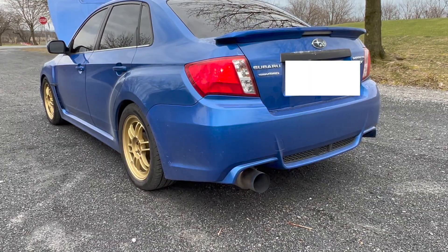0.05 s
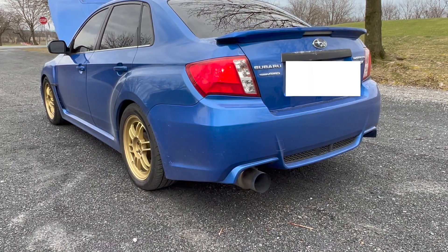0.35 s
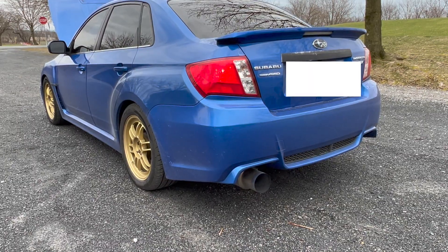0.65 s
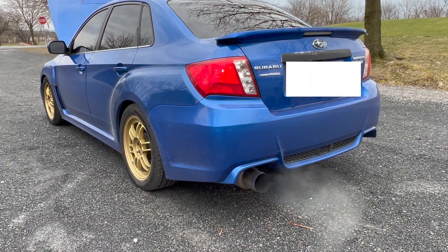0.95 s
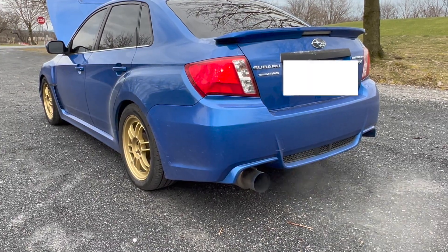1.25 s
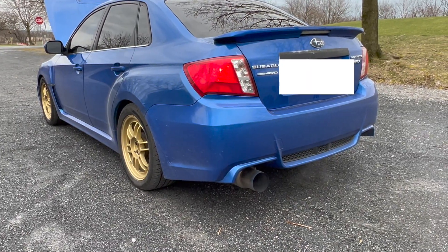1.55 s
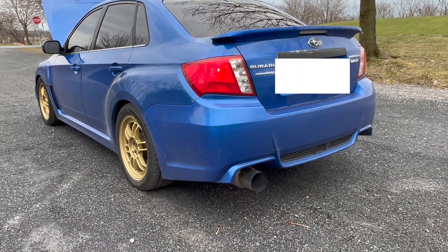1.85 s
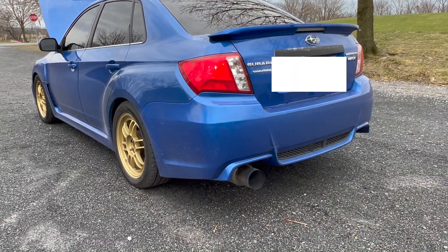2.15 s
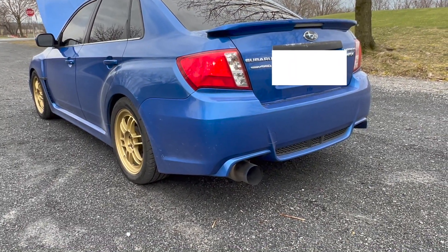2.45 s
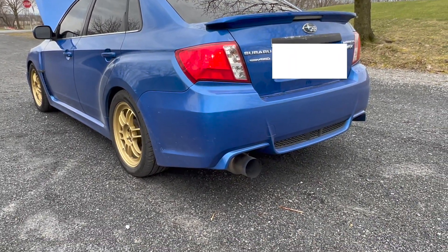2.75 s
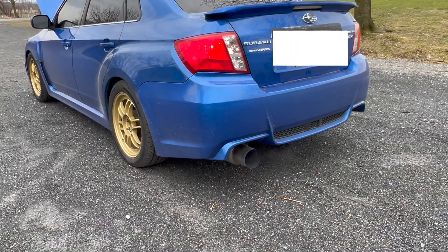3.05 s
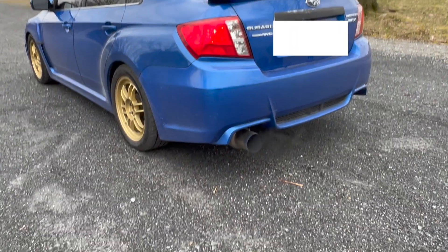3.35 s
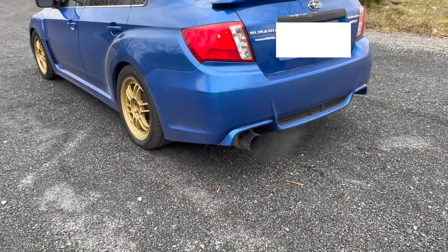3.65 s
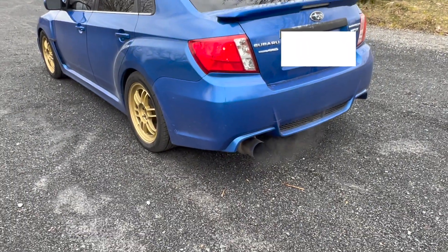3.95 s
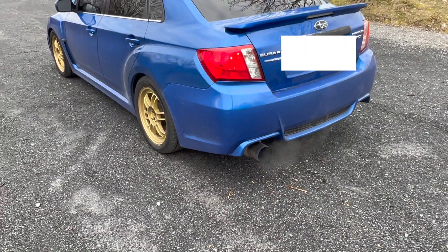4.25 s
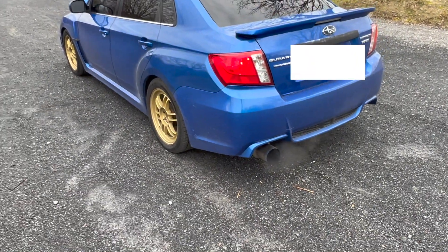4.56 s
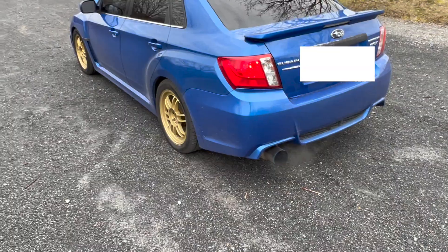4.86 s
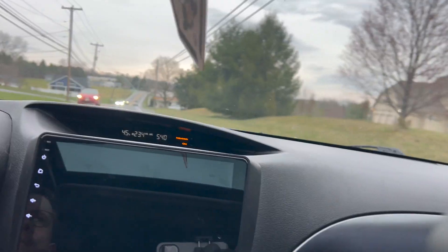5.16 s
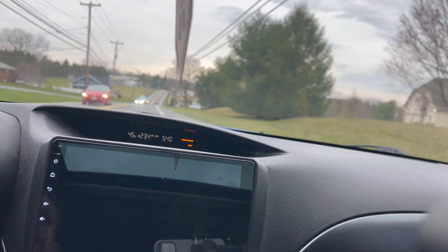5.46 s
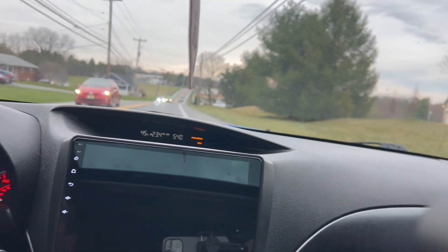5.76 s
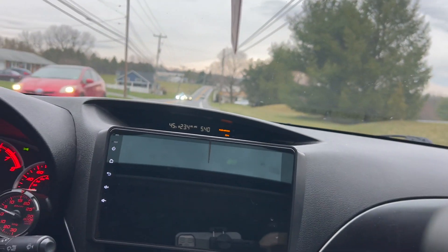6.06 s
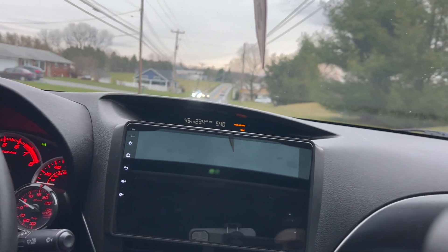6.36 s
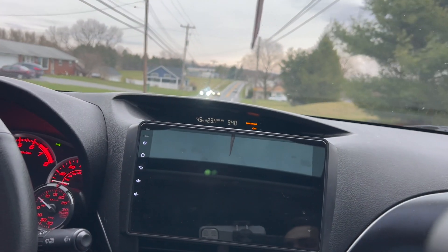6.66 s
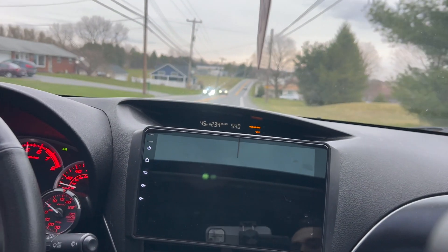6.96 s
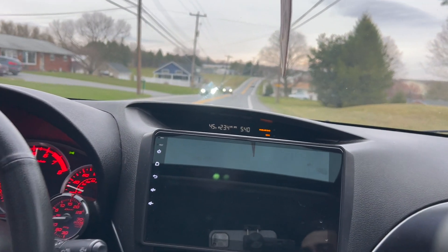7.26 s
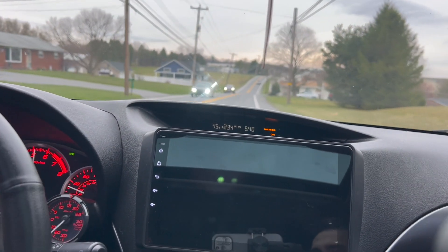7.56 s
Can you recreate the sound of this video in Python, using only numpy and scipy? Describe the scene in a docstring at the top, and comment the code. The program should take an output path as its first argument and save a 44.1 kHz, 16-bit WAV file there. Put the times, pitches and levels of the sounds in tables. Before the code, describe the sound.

Close behind a turbocharged car, the engine is revved once with a deep bark. The exhaust cracks and pops as the revs rise and fall, then settles into a lumpy idle while a faint turbo whistle winds down. The sound cuts to inside the moving car, where the engine growls upward over tyre rumble, eases off with soft exhaust thumps and begins to pull again.

```python
"""Behind the tailpipe of a turbocharged flat-four, then in its cabin. Outside, one blip: firings from
unequal headers ring the pipe and bark, the exhaust cracks and pops, the revs sink to a lumpy idle and
the turbo whistle winds down. Inside, the car pulls hard through one gear, burbles with the throttle
lifted and picks up in the next: engine orders sweep the air modes and body panels, over tyre
rumble, intake hiss and ticking trim."""
import sys
import numpy as np
from scipy import signal
from scipy.fft import rfft, irfft
from scipy.io import wavfile
from scipy.ndimage import uniform_filter1d

SR = 44100
rng = np.random.default_rng(int(sys.argv[2]) if len(sys.argv) > 2 else 0)


def to_wav(s):
    """Save 16-bit WAV."""
    ch = np.atleast_2d(s).T  # columns
    pcm = np.round(np.clip(ch, -1, 1) * 32767)  # PCM
    wavfile.write(sys.argv[1], SR, pcm.astype(np.int16))


N = 344421
T = np.arange(N) / SR
GRID_HZ = np.geomspace(20, 20000, 900)
INSIDE_S, CUTOFF_HZ = 5.089, 15800
CRACK_LAG_FIRINGS = .46
LIFT_DB = -11.5  # engine in the cabin, throttle shut

# Tailpipe, over time
FIRING_RATE = [(0, 58), (.35, 46.77), (.63, 39.6), (.73, 42.97), (.85, 65.89), (.96, 86.69), (1.05, 94.73),
               (1.18, 84.64), (1.3, 78.94), (1.6, 65.19), (2.15, 44.54), (2.4, 39.31), (3.0, 34.0),
               (3.4, 32.25), (4.2, 33.12), (4.55, 33.68), (4.8, 33.09), (5.09, 32.03)]  # t/s, firing rate/Hz
MISFIRE = [(0, 0.49), (.55, 0.25), (.9, 0.18), (1.45, 0.11), (2.05, 0.55), (2.25, 0.36), (2.7, 0.18),
           (5.1, 0.04)]  # t/s, firing unevenness/0-1
EFFORT = [(0, -21), (.22, -26), (.38, -36.5), (.48, -33), (.55, -30), (.66, -23.5), (.76, -13.5), (.91, -9),
          (1.06, -14), (1.25, -12), (1.52, -14.5), (1.6, -22.5), (1.7, -16), (1.8, -20.5), (2.04, -23),
          (2.14, -32), (2.55, -34), (3.5, -29.5), (5.09, -31)]  # firing strength: t/s, level/dB
PEDAL = [(.68, 0), (.8, 0.3), (1.07, 0.77), (1.11, 0), (1.6, 0.02)]  # t/s, throttle/0-1
TURBO = [(0, 2564, -46), (.55, 2338, -61), (.85, 2520, -46.5), (1.1, 2977, -40.5), (1.5, 2835, -48),
         (1.9, 2617, -44), (2.25, 2444, -53), (2.52, 2200, -63.5), (2.72, 1930, -62.5), (3.0, 1740, -60),
         (3.42, 1590, -58), (3.56, 1490, -58), (3.7, 1356, -58), (4.2, 1241, -53.5), (5.1, 1138, -57.5)]  # whistle: t/s, f/Hz, level/dB
STEEPNESS = [(0, -24), (.4, -53), (.62, -48), (.76, -16), (.92, -17.5), (1.05, -22), (1.2, -11),
             (1.45, -15), (1.62, -29), (1.75, -36), (2.05, -32), (2.3, -65), (5.09, -72.5)]  # pulse fronts at the tip: t/s, level/dB
# Loud exhaust cracks and pops: hard firings on the climb, afterfire as revs fall
POPS = [(.145, -17, -29, -57), (.164, -11, -50, -60), (0.648, -28, -33, -52), (0.7145, -27, -24, -34.5),
        (0.789, -6.5, -16, -29.5), (0.849, -4, -14.5, -34), (0.8626, -26, -5.5, -36),
        (0.916, -12, -12, -46), (1.5248, -4.5, -3.5, -35), (1.53, -2, -3, -42), (1.651, -33, -25, -44),
        (1.675, -23, -23, -42), (1.701, -16, -33, -41), (1.722, -19, -22.5, -47), (1.742, -24, -28, -50),
        (1.77, -27, -28, -39), (1.817, -18, -27.5, -58), (1.841, -39, -40, -40), (1.895, -18, -22.5, -33.5),
        (1.938, -25, -32, -49), (1.994, -20, -27, -38.5), (2.057, -22, -40, -46)]  # t/s, boom/dB, crack/dB, spit/dB
# Per cylinder: level/dB
CYLINDER_DB = [0.64, -1.7, .3, 0.023]
CYLINDER_CRACK_DB = [-14, -2.5, -2.5, -14.5]
# Cool pipe: f/Hz, t60/s, near bank (short header)/dB, far bank (long header)/dB
PIPE_MODES = [(67.4, 0.46, -59.5, -20), (122.7, 0.25, -65, -13), (138.2, 0.32, -25.5, -18.5),
              (218.5, 0.067, -15.5, -40.5), (255.5, 0.25, -18.5, -34), (311, 0.57, -53.5, -35),
              (347.4, 0.14, -32, -29), (466, 0.33, -45.5, -54)]
# Tailpipe spectra: f/Hz, level/dB
HOT_PIPE = [(30, -32), (55, -0.5), (75, 3), (88, 7.5), (115, -3.5), (146, -3.5), (174, 1), (220, -17.5),
            (262, -12.5), (292, -5.5), (350, -18.5), (440, -34.5), (490, -14), (620, -44.5), (800, -55),
            (3000, -91)]  # resonances lifted by hot gas
HOT_HEADER = [(30, -36.5), (55, -22), (68, -6.5), (91, -5.5), (128, -4.5), (160, -2.5), (200, -7),
              (250, -16), (330, -19.5), (380, -11.5), (415, -13), (450, -37), (495, -18.5), (600, -35),
              (800, -52.5), (3000, -90)]  # gas rocking between the banks
OPEN_PIPE = [(40, -44.5), (70, -3.5), (92, 2.5), (125, 0), (168, 6), (205, -7.5), (262, 6.5), (300, -6),
             (355, -5), (410, -6.5), (440, -18), (475, -8), (580, -15), (660, -37), (800, -21), (1500, -48)]  # throttle open
PULSE_EDGE = [(100, -33.5), (165, 15.5), (215, 9.5), (270, 12), (370, 4.5), (440, 3.5), (500, -0.5),
              (590, 1), (660, -23.5), (850, -28), (1500, -20.5), (4000, -62)]
GAS_RUSH = [(300, -41), (660, -5), (710, 6.5), (800, 5.5), (950, 0), (1300, 8.5), (1800, -1), (1960, -2.5),
            (2060, -16), (2250, 0), (2500, -2.5), (3100, -5.5), (3600, -20.5), (6000, -57)]
TIP_FIZZ = [(2000, -48.5), (3600, 11.5), (4400, 7), (5600, 2), (7000, 5), (8600, 2.5), (10000, -29),
            (12000, -6), (15500, -17)]
CRACK = [(200, -23.5), (500, 7), (900, 3), (1400, 10), (1800, 1.5), (2060, -19.5), (2400, 1), (2900, 3),
         (3700, -16), (8000, -48), (11000, -67)]
CHUFF = [(150, -22), (330, 4.5), (430, -6.5), (530, -6.5), (660, -16), (1200, -45)]
POP_BOOM = [(50, -26), (130, .5), (200, -8), (258, 10), (310, 3), (375, 4.5), (440, -9), (495, 5),
            (700, -19.5), (2000, -38.5)]

# Cabin, over time
CABIN_FIRING_RATE = [(5.09, 99.3), (5.3, 104.7), (5.8, 123.4), (6.2, 140.6), (6.5, 156), (6.9, 175.7),
                     (7.02, 179), (7.15, 176.5), (7.3, 176), (7.45, 171.3), (7.66, 160), (7.81, 146.5)]  # t/s, firing rate/Hz
THROTTLE = [(5.1, 0.79), (6.3, 0.96), (7.04, 0.88), (7.13, 0.39), (7.2, 0.15), (7.56, 0.05), (7.6, 0.14),
            (7.68, 0.33), (7.77, 0.67)]  # t/s, throttle/0-1
BUMPS = [(5.1, -43.5), (5.75, -34), (6.35, -33), (6.6, -19), (7.05, -31), (7.22, -25), (7.45, -30),
         (7.58, -26), (7.8, -38)]  # road rumble: t/s, level/dB
BOOST = [(5.1, 3300, -22.5), (5.5, 4100, -18), (5.9, 4710, -12), (6.15, 5000, -14), (6.42, 5210, -11),
         (6.65, 5210, -20), (7.0, 5350, -25), (7.25, 4730, -23), (7.62, 3400, -9), (7.8, 3430, -21)]  # turbo whine: t/s, f/Hz, level/dB re intake hiss
TICKS = [(5.2894, -32.5), (5.371, -27.5), (5.3986, -40), (7.233, -39.5), (7.376, -33.5)]  # trim: t/s, level/dB
BURBLES = [(7.184, -18.5), (7.252, -17), (7.318, -17), (7.353, -10), (7.55, -15)]  # overrun thumps: t/s, level/dB
# Orders of the four-stroke cycle: level/dB
BOOM_DB = [-9, -6, 1, 1.5, -12, -4.5, 2, -3.5]  # from order 2
GROWL_DB = [-14.5, 0, 2.5, 4, -7, 3, -2.5, 4.5, -6, -1.5, 6.5, 4.5, 3, -1, 3.5, 0, 1.5, -1.5, 5.5, -0.5, 1,
            -3.5, 1, -1, 3.5, -5, 1.5, 3]  # from order 10
# Resonances: f/Hz, width/Hz, level/dB
AIR_MODES = [(75.5, 25.5, 10), (102.4, 21.3, 18.5), (137.6, 19.3, 9), (156.5, 31.4, 15), (193, 55, -3),
             (223.3, 5.8, 4), (246.7, 26, -4.5), (292.7, 43, 15), (310.3, 19, -9.5), (333.5, 7.4, 6)]
PANELS = [(286.6, 45, 14), (444, 38, 14.1), (549.6, 36, 10.9), (630, 28, 12), (725, 30, 4.4), (994, 28, 16),
          (1092, 46, 15.5), (1242, 67, 11), (1314, 11, 7.7), (2050, 35, 7.2), (2158, 44, 14.7),
          (2392, 50, 5.5), (2850, 46, 3.2), (3170, 170, 14)]
# Turbulent part of the growl: f/Hz, power share/0-1
TURBULENT = [(250, .05), (600, .12), (1100, 0.36), (1500, 0.4), (2600, 0.3)]
# Cabin spectra: f/Hz, level/dB
BODY = [(150, 3), (230, 4), (380, 0.5), (500, -8), (670, -9), (800, -4), (890, -15), (1030, -10),
        (1180, -21.5), (1300, -14.5), (1750, -20), (2400, -28.5), (3000, -33), (4500, -61.5)]  # transmission through the body
LIFT_TILT = [(200, -3), (550, -0.5), (800, -10), (1100, -12), (1400, -16)]  # growl darkening, throttle shut
INTAKE_HISS = [(1800, -13.5), (3000, -1), (4000, -4), (5500, -7), (7000, -12), (8700, -12.5),
               (10500, -39.5), (13000, -19), (15500, -22)]
INTAKE_ROAR = [(150, -10), (350, 0), (700, -5), (1200, -7), (1900, -13), (3000, -20), (5000, -40)]
TYRES = [(30, -22), (140, -3), (240, -7), (310, -11.5), (520, -12.5), (750, -15), (1300, -30),
         (3000, -53), (6000, -73)]
RUMBLE = [(12, -33.5), (28, -10.5), (48, 4), (65, -6.5), (110, -15), (300, -58.5)]
TRIM = [(2000, -2), (5000, 5), (7000, -.5), (13000, -13.5), (15500, -8)]
THUMP = [(30, -17), (65, 3.5), (88, -19.5), (125, 4), (180, -18), (400, -47), (900, -49)]


def amp(db):
    """dB to gain."""
    return 10 ** (np.asarray(db) / 20)


def unit(x):
    """Scale to rms 1."""
    return x / np.sqrt(np.mean(x ** 2) + 1e-20)


def steady(x, size=5400):
    """Hold short-time rms at 1."""
    return x / np.sqrt(uniform_filter1d(uniform_filter1d(x.mean(0) ** 2, size), size // 2) + 1e-14)


def curves(rows):
    """Each column of a time table, per sample."""
    t_s, *columns = np.transpose(rows)
    return [np.interp(T, t_s, column) for column in columns]


def read(spectrum, hz):
    """Table value at hz, log frequency axis."""
    knots_hz, values = np.transpose(spectrum)
    return np.interp(np.log(hz + 1), np.log(knots_hz + 1), values)


def colour(x, spectrum, size=8192):
    """Minimum-phase filter, impulse response peak 1."""
    hz = abs(np.fft.fftfreq(size, 1 / SR))
    rolloff = 1 + (hz / spectrum[-1][0] / 2) ** 4
    log_gain = np.log(amp(read(spectrum, hz)) / rolloff + 1e-6)
    impulse = np.fft.ifft(np.exp(np.conj(signal.hilbert(log_gain)))).real[:size // 2]
    return signal.oaconvolve(np.atleast_2d(x), impulse[None] / abs(impulse).max(), axes=1)[:, :N]


def clicks(times_s, sizes):
    """Single-sample impulses."""
    return np.bincount(np.clip(np.round(times_s * SR).astype(int), 0, N), sizes, N + 1)[:N]


def wander(hz):
    """Random drift, rms about 1."""
    return 1.2 * np.interp(T * hz, np.arange(4096), rng.standard_normal(4096))


def air(spread):
    """Stereo white noise; spread is side/mid."""
    mid, side = rng.standard_normal((2, N))
    return np.array([mid + spread * side, mid - spread * side])


def crossings(firings):
    """Sample and cylinder (0-3) at each whole firing count."""
    at = np.flatnonzero(np.diff(np.floor(firings)) > 0)
    return at, np.floor(firings[at + 1]).astype(int) % 4


def by_effort(full_db, db_per_db):
    """Gain following firing strength; full effort is -14 dB."""
    return amp(full_db + db_per_db * (curves(EFFORT)[0] + 14))


def by_turbo(db, db_per_decade, ref_hz=2450):
    """Gain following turbo speed."""
    return amp(db + db_per_decade * np.log10(curves(TURBO)[0] / ref_hz))


def bank(pulses, side, soften_hz=430):
    """One bank (0 near, 1 far) rings the pipe; low-pass softens each onset so it does not tick."""
    t = T[:SR // 2]
    modes = sum(amp(db[side] - 60 * t / t60_s) * np.sin(2 * np.pi * hz * t)
                for hz, t60_s, *db in PIPE_MODES)
    softened = signal.sosfilt(signal.butter(6, soften_hz, fs=SR, output="sos"), modes)
    return signal.oaconvolve(pulses, softened)[None, :N]


def muffler(x, hz, width_hz):
    """All-pass chamber: delays the bass, rounding each pulse."""
    radius = np.exp(-np.pi * width_hz / SR)
    poles = [1, -2 * radius * np.cos(2 * np.pi * hz / SR), radius ** 2]
    return signal.lfilter(poles[::-1], poles, x)


def cool_pipe(firings, times_s, sizes, cylinder, near_lag_s=.0002, far_lag_s=.002):
    """Unequal headers: two bright knocks, two deep thuds, one swell per cycle."""
    near = bank(clicks(times_s + near_lag_s, sizes * (cylinder < 2)), 0)
    far = bank(clicks(times_s + far_lag_s, sizes * (cylinder >= 2)), 1)
    lope = 1 + .16 * np.cos(np.pi / 2 * (firings - 1.3))
    return muffler(steady(near + far), hz=82, width_hz=70) * lope


def pipe_note(cool, pulses, rocking, heat):
    """The drone shifts as the gas heats and becomes a roar on open throttle."""
    pedal = curves(PEDAL)[0]
    hot = steady(steady(colour(pulses, HOT_PIPE)) + amp(-4) * steady(colour(rocking, HOT_HEADER)))
    drone = np.sqrt(1 - heat) * cool + np.sqrt(heat) * hot
    roar = amp(1) * steady(muffler(colour(pulses + .22 * rocking, OPEN_PIPE), hz=258, width_hz=130))
    note = np.sqrt(1 - pedal) * drone + np.sqrt(pedal) * roar
    open_tip = signal.butter(2, 35, "highpass", fs=SR, output="sos")  # radiates no sub-bass
    return steady(signal.sosfilt(open_tip, note))


def chuff(firings):
    """The near bank pushes out one soft chuff per cycle."""
    swell = np.exp(.4 * np.cos(np.pi / 2 * (firings - .8)))
    return by_effort(-30.5, 1.36) * steady(colour(swell * air(.35), CHUFF))


def gas_flow(puffs):
    """Gas from the firings and the turbine rushes out, fizzing at the tip."""
    rush_gain = amp(4.5) * np.hypot(by_effort(-42, 1.77), by_turbo(-59.5, 53))
    fizz_gain = np.hypot(by_effort(-51, 1.75), by_turbo(-68.5, 85))
    rush = steady(colour(puffs * air(.098), GAS_RUSH))
    fizz = steady(colour(puffs * air(.9), TIP_FIZZ))
    return rush_gain * rush + fizz_gain * fizz


def exhaust(firings, firing_hz, cool_hz=36, hot_hz=72, full_push_hz_per_s=200):
    """Uneven firings sound the pipe; each has a barking edge and a turbulent puff."""
    misfire = curves(MISFIRE)[0]
    heat = np.clip((firing_hz - cool_hz) / (hot_hz - cool_hz), 0, .97)
    push = np.clip(uniform_filter1d(np.gradient(firing_hz) * SR, 3000) / full_push_hz_per_s, 0, 1)
    at, cylinder = crossings(firings)
    strength, late = rng.standard_normal((2, 600))[:, :len(at)] * misfire[at]
    times_s = T[at] + .0015 * late
    sizes = np.exp(1.05 * strength) * amp(CYLINDER_DB)[cylinder]
    hot_s = times_s + CRACK_LAG_FIRINGS / firing_hz[at]  # hot pulses arrive with their cracks
    pulses = clicks(hot_s, sizes)
    rocking = clicks(hot_s, sizes * np.array([-1, 1, 1, -1])[cylinder])
    cool = cool_pipe(firings, times_s, sizes, cylinder)
    note = amp(curves(EFFORT)[0] - push) * pipe_note(cool, pulses, rocking, heat)
    puffs = .79 + np.exp(-((firings - .45) % 1) / .42)
    puffs *= np.exp((.12 + .5 * misfire) * wander(120))
    edge = steady(colour(pulses + rocking + .005 * puffs * air(.22), PULSE_EDGE))
    bark = amp(-.5 * push) * by_effort(-25, 1.14) * np.sqrt(heat) * edge
    return note + bark + chuff(firings) + gas_flow(puffs)


def whistle(hz, width_hz, spread):
    """Narrow noise band following a pitch."""
    phase_rad = 2 * np.pi * np.cumsum(hz) / SR
    lowpass = signal.butter(2, width_hz / 2, fs=SR, output="sos")
    baseband = signal.sosfilt(lowpass, air(spread) + 1j * air(spread))
    return unit((baseband * np.exp(1j * phase_rad)).real)


def turbo(firings):
    """Fast, it chirps once per firing; slow, it is a breathy whistle."""
    hz, db = curves(TURBO)
    fast = np.clip((hz - 1900) / 400, 0, 1)
    throb = np.cos(2 * np.pi * (firings - .55))
    chirps = np.exp(.2 * wander(150) + .81 * np.cos(2 * np.pi * (firings - .28)))
    rasp = unit(chirps * whistle(hz * (1 + .04 * throb), 420, .25))
    tone = whistle(hz, 180, .11) + amp(-14) * whistle(2 * hz, 450, .88)
    breathy = unit(tone * (1 + .18 * throb))
    return amp(db) * (np.sqrt(fast) * rasp + np.sqrt(1 - fast) * breathy)


def cracks(firings, spread_db=1.1, scatter_db=-9, scatter_t60_s=.078):
    """Firings and pops steepen, crack at the tip and scatter off ground and underbody."""
    at, cylinder = crossings(firings - CRACK_LAG_FIRINGS)
    chance_db = spread_db * rng.standard_normal(600)[:len(at)]
    front_db = curves(STEEPNESS)[0][at] + np.array(CYLINDER_CRACK_DB)[cylinder] + chance_db
    pop_s, _, pop_db, _ = np.transpose(POPS)
    fronts = colour(clicks(T[at], amp(front_db)) + clicks(pop_s, amp(pop_db)), CRACK)
    t = T[:SR // 8]
    scatter = rng.standard_normal((2, len(t))) * amp(-60 * t / scatter_t60_s)
    scatter /= np.linalg.norm(scatter[0])
    return fronts + amp(scatter_db) * signal.oaconvolve(fronts, scatter, axes=1)[:, :N]


def pops(spit_rise_s=.0029):
    """Loud exhaust pops: a boom through the pipe, a spit at the tip."""
    pop_s, boom_db, _, spit_db = np.transpose(POPS)
    booms = colour(clicks(pop_s, amp(boom_db)), POP_BOOM)
    age = T[:SR // 8] / spit_rise_s
    spits = signal.oaconvolve(clicks(pop_s, amp(spit_db - 9)), age * np.exp(1 - age))[:N]
    return booms + spits * unit(colour(air(.79), TIP_FIZZ))


def order_tone(order, cycle_rad):
    """One engine order; standing waves put left and right out of step."""
    skew_rad = rng.choice([-1, 1]) * np.interp(order, [3, 8, 13, 26, 70], [.062, .71, .79, .69, .73])
    # orders 3-5 in phase: the firing note throbs once per cycle
    start_rad = 0 if order in (3, 4, 5) else 2 * np.pi * rng.random()
    return np.sqrt(2) * np.cos(order * cycle_rad + start_rad + [[skew_rad], [-skew_rad]])


def cabin_boom(cycle_hz, cycle_rad, throttle):
    """Low orders sweep the air modes; on overrun, order 2 drones at half the firing rate."""
    overrun_db = 32.5 * np.clip(1 - throttle / .28, 0, 1)
    modes_db = sum(db * 2 ** -(2 * (GRID_HZ - hz) / width_hz) ** 2 for hz, width_hz, db in AIR_MODES)
    boom = np.zeros((2, N))
    for order, order_db in enumerate(BOOM_DB, 2):
        db = order_db + np.interp(order * cycle_hz, GRID_HZ, modes_db) + overrun_db * (order == 2)
        boom += order_tone(order, cycle_rad) * amp(db) * (1 + .11 * wander(25))
    return amp(-28) * boom


def cabin_growl(cycle_hz, cycle_rad, throttle, swell_db=3.5, hop=64):
    """High orders and firing-chopped turbulence ring the panels, louder with revs."""
    panels_db = sum(db / (1 + (2 * (GRID_HZ - hz) / width_hz) ** 2) for hz, width_hz, db in PANELS)
    body = amp(read(BODY, GRID_HZ) + panels_db)
    turbulent = read(TURBULENT, GRID_HZ)
    tonal = body * np.sqrt(1 - turbulent)
    flutter = .7 - .4 * throttle
    orders_db = np.pad(GROWL_DB, (10, 72))
    tones = np.zeros((2, N))
    for order in range(10, 72):
        tone = order_tone(order, cycle_rad)
        gain = np.interp(order * cycle_hz[::hop], GRID_HZ, tonal)
        gain *= amp(orders_db[order] + swell_db * wander(7)[::hop])
        tones += np.repeat(gain, hop)[:N] * (1 + flutter * wander(20)) * tone
    dark = irfft(rfft(tones) * amp(read(LIFT_TILT, np.fft.rfftfreq(N, 1 / SR))), N)
    tones = throttle * tones + (1 - throttle) * dark
    gusts = (1 + .64 * np.cos(4 * cycle_rad)) * np.exp(.23 * wander(14)) * air(.7)
    gust_db = 20 * np.log10(body * np.sqrt(turbulent))
    rough = unit(colour(gusts, list(zip(GRID_HZ, gust_db))))
    level_db = 28 * np.log10(cycle_hz / 35) + 2.5 - throttle
    return amp(level_db) * (amp(-37) * tones + amp(-35) * rough)


def road():
    """Tyres roll steadily; bumps rumble."""
    tyres = amp(-30) * unit(colour(air(.98), TYRES))
    return tyres + amp(curves(BUMPS)[0] - 2) * steady(colour(air(.05), RUMBLE))


def valve_train(cycle_rad, size=640):
    """Fine clatter repeating each cycle, heard as faint close tones."""
    place = np.arange(size) / size
    return np.array([np.interp(cycle_rad / (2 * np.pi), place, pattern, period=1)
                     for pattern in rng.standard_normal((2, size))])


def intake(cycle_rad, lift):
    """Air gulped per firing roars; hiss, valve clatter and whine grow with turbo speed."""
    boost_hz, boost_db = curves(BOOST)
    gulps = 1 + .17 * np.cos(4 * cycle_rad)
    roar = amp(-39.5 + LIFT_DB * lift) * unit(colour(gulps * air(.7), INTAKE_ROAR))
    hiss = unit(colour(gulps * unit(air(.84)) + amp(-2) * unit(valve_train(cycle_rad)), INTAKE_HISS))
    whine = amp(boost_db + 2 * wander(9.8)) * whistle(boost_hz, 190, .53)
    hiss_db = -47 + 38 * np.log10(boost_hz / 5000) - 6 * lift
    return roar + amp(hiss_db) * (hiss + whine)


def trim_ticks(decay_s=.018):
    """Trim ticks: short bursts of bright noise."""
    times_s, db = np.transpose(TICKS)
    envelope = signal.lfilter([1], [1, -np.exp(-1 / (decay_s * SR))], clicks(times_s, amp(db - 12)))
    return envelope * unit(colour(air(.2), TRIM))


def burble():
    """The exhaust thumps with the throttle shut."""
    times_s, db = np.transpose(BURBLES)
    return colour(clicks(times_s, amp(db)), THUMP)


def tailpipe():
    """The blip, from behind the car."""
    firing_hz = curves(FIRING_RATE)[0]
    firings = np.cumsum(firing_hz) / SR - .44
    return exhaust(firings, firing_hz) + turbo(firings) + cracks(firings) + pops()


def cabin():
    """Pull, lift and pick-up, from inside; four firings per cycle."""
    cycle_hz, throttle = curves(CABIN_FIRING_RATE)[0] / 4, curves(THROTTLE)[0]
    cycle_rad = 2 * np.pi * (np.cumsum(cycle_hz) / SR + .0008 * wander(30))
    lift = 1 - throttle
    engine = cabin_boom(cycle_hz, cycle_rad, throttle) + cabin_growl(cycle_hz, cycle_rad, throttle)
    return amp(LIFT_DB * lift) * engine + road() + intake(cycle_rad, lift) + trim_ticks() + burble()


def scene():
    """Tailpipe, then cabin; 6 ms crossfade."""
    outside = tailpipe() * amp([[-.65], [.65]])
    inside = cabin() * amp([[-.7], [.6]])
    fade = np.clip((T - INSIDE_S) / .006, 0, 1)
    return (1 - fade) * outside + fade * inside


def record(dry):
    """Soft limit, then low-pass."""
    limited = dry / (1 + dry ** 8) ** (1 / 8)
    lowpass = signal.firwin(511, CUTOFF_HZ, window=("kaiser", 9), fs=SR)
    return signal.oaconvolve(limited, lowpass[None], "same")


dry = scene()
out = record(dry)
to_wav(out)
```